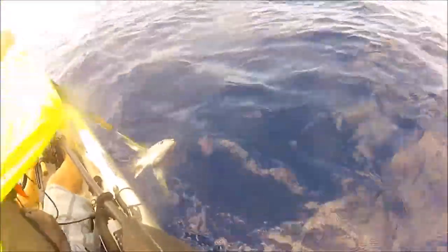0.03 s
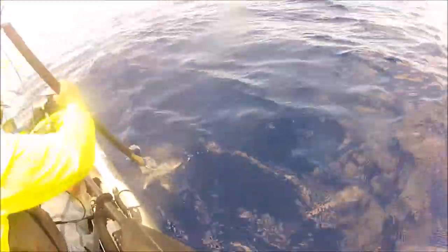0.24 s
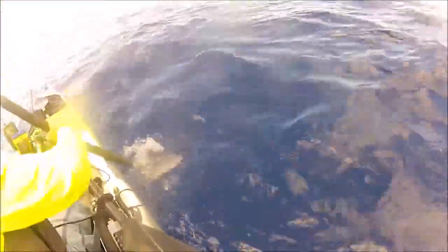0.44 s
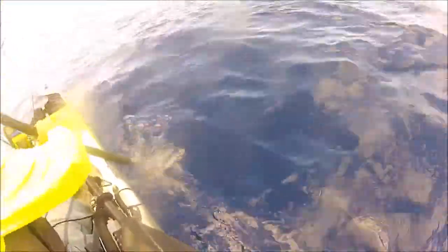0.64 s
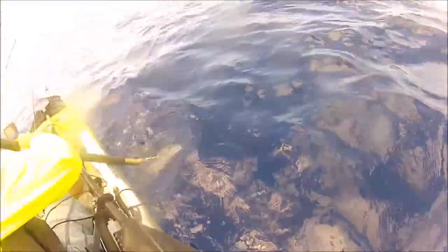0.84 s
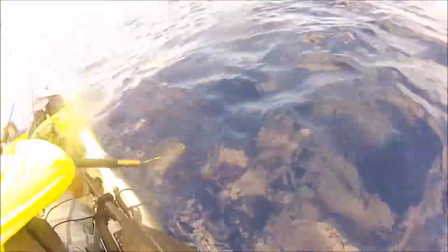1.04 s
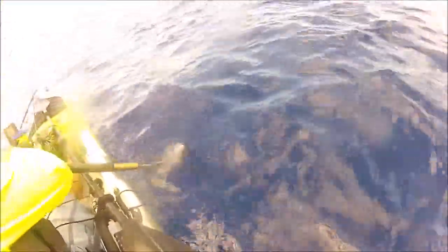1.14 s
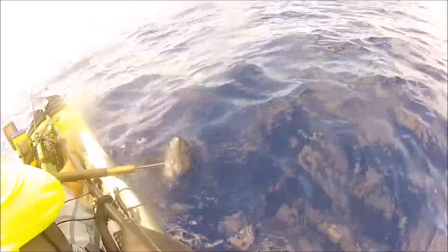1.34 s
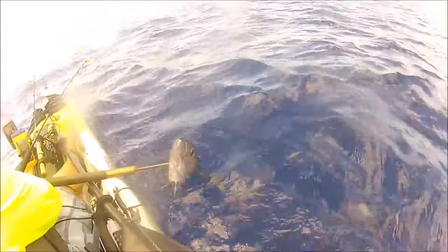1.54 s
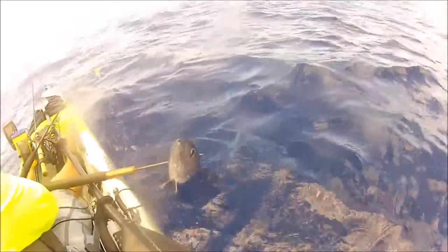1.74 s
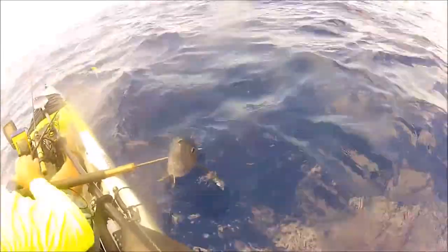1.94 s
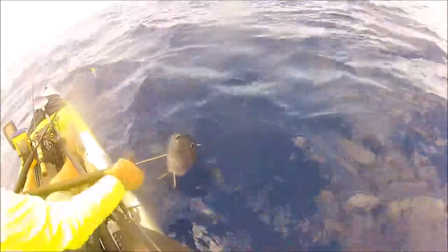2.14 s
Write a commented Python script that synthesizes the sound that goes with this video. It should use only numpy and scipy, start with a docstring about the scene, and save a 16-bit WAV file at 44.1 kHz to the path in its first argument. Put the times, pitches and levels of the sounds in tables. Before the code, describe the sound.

Hollow knocks on a plastic kayak hull dominate, heard through a waterproof camera housing over faint wind and sea. At about 0.1 seconds a fish splashes in with a gulp, and drops patter until 0.8. The hull booms hardest from 0.4 to 0.7 seconds, then bumps and rumbles more softly. Water glugs underneath around 1 second, and tackle clicks at 1.4 and 1.7.

```python
"""Over faint wind and open water, a fish on a pole slaps into the sea beside a plastic kayak.
Trapped air gulps, then spray patters back down in ticks and pings. From about 0.4 s the hollow
hull booms under hard knocks and rumbles as the angler shifts. Around 1 s water glugs beneath it,
and the tackle clicks at 1.4 and 1.7 s. All is heard through a camera's waterproof housing."""
import sys
import numpy as np
from scipy import signal
from scipy.io import wavfile
from scipy.ndimage import uniform_filter1d

SR = 44100
rng = np.random.default_rng(int(sys.argv[2]) if len(sys.argv) > 2 else 0)


def log_audio(samples):
    """Write samples as a 16-bit WAV file to the path given in sys.argv[1]."""
    # one column per channel
    frames = np.atleast_2d(samples).T
    # limit to full scale, then quantise
    limited = np.clip(frames, -1, 1)
    pcm = np.round(limited * 32767).astype(np.int16)
    wavfile.write(sys.argv[1], SR, pcm)


N = 97020
HULL_TOP_HZ = 1430


def amp(db):
    """Decibels to gain."""
    return 10 ** (np.asarray(db) / 20)


def unit(x):
    """Scales to rms 1."""
    return x / np.sqrt(np.mean(x ** 2) + 1e-20)


def level(points, column=1):
    """A fader ride: gain over time from a column of dB points."""
    rows = np.array(points)
    return amp(np.interp(np.arange(N) / SR, rows[:, 0], rows[:, column]))


def add(mix, s, sound):
    """Mixes a sound in at time s."""
    part = mix[max(round(s * SR), 0):][:len(sound)]
    part += sound[:len(part)]


def colour(x, points, size=16384):
    """Minimum-phase EQ of unit energy, drawn through (Hz, dB) points."""
    hz, db = np.transpose(points)
    bins_hz = abs(np.fft.fftfreq(size, 1 / SR))
    log_gain = np.log(amp(np.interp(np.log(bins_hz + 1), np.log(hz + 1), db)))
    taps = np.fft.ifft(np.exp(np.conj(signal.hilbert(log_gain)))).real[:size // 2]
    return signal.fftconvolve(x, taps / np.linalg.norm(taps))[:len(x)]


def lowpass(x, hz, order=6):
    """Causal Butterworth low-pass."""
    return signal.sosfilt(signal.butter(order, hz, fs=SR, output="sos"), x)


def fade(t, t60):
    """Falls 60 dB in t60 seconds."""
    return np.exp(-np.log(1000) * t / t60)


def wander(size):
    """Random drift of rms 1, smoothed over size samples."""
    return unit(uniform_filter1d(uniform_filter1d(rng.standard_normal(N), size), size))


def noise(eq, patchy_db):
    """Coloured noise of rms 1 whose level wanders."""
    steady = colour(rng.standard_normal(2 * N), eq)[N:]
    return unit(steady * amp(patchy_db * wander(size=2500)))


def patter(per_s, spread_db):
    """Random tiny impacts; a wider spread makes a few stand out."""
    sizes = amp(spread_db * np.minimum(rng.exponential(1, N), 4))
    return unit(sizes * rng.choice([-1, 1], N) * (rng.random(N) < per_s / SR))


def bubble(hz, t60, attack_s=0.00093, glide_per_s=0.55):
    """Trapped air rings briefly, rising in pitch and wobbling as the pocket deforms."""
    t = np.arange(SR // 5) / SR
    wobble = 0.035 * wander(size=100)[:len(t)]
    turns = np.cumsum(hz * (1 + glide_per_s * t + wobble)) / SR
    return np.sin(2 * np.pi * turns) * fade(t, t60) * (1 - np.exp(-t / attack_s))


def splash():
    """Sharp slaps with a wet ring, then thinning spray and single drops that tick and ping."""
    # fish and thrown water hitting the surface: (time [s], level [dB], t60 [s], ring pitch [Hz])
    slaps = [(0.1294, -32, 0.0087, 4470), (0.1322, -43, 0.044, 2310), (.138, -37, 0.065, 4400),
             (0.146, -28, 0.017, 3270), (.149, -28, 0.012, 4070), (0.153, -42, 0.018, 2420),
             (.169, -47.5, 0.058, 2820), (0.195, -47, 0.0088, 4120), (.253, -46, 0.068, 2630),
             (0.2582, -47, 0.0076, 5140), (0.366, -49.5, 0.043, 4220)]
    # fader ride of the falling spray: (time [s], level [dB])
    spray = [(0, -73), (.12, -66.5), (.135, -44.5), (.16, -44.5), (.185, -47.5), (.205, -57.5), (.24, -62),
             (.26, -59), (.3, -53.5), (.34, -59.5), (.42, -66), (.66, -63.5), (.75, -70.5), (.83, -73),
             (2.2, -78.5)]
    # drops falling back: (time [s], pitch [Hz], ping [dB], tick [dB])
    drops = [(0.2711, 2830, -53, -33), (.292, 3000, -52, -38), (0.303, 2870, -47, -37),
             (0.323, 3130, -56, -45), (.4535, 2874, -46, -39.5), (0.464, 2950, -56, -48),
             (0.511, 2900, -60, -49), (.537, 2880, -51.5, -43), (0.605, 2990, -50, -54),
             (0.663, 2870, -54, -53), (0.673, 3116, -58, -40.5), (0.724, 2420, -50.5, -49),
             (0.739, 2890, -59, -42), (0.78, 3254, -57, -45), (0.796, 1820, -57, -58)]
    # EQ the housing puts on the water noise: (frequency [Hz], level [dB])
    housing_eq = [(300, -26), (800, -9), (1500, -24), (2100, -7.5), (2600, -1.5), (2800, 5.5), (2920, 2),
                  (3080, -1), (3400, -19.5), (3850, -6.5), (4200, -10), (4500, -9), (5100, -7),
                  (6000, -22.5), (7100, -8.5), (8400, -19), (9100, -4.5), (10400, -26.5), (11500, -51.5),
                  (12600, -26.5), (13500, -28), (14900, -14), (15700, -2.5)]
    crackle_share, slap_attack_s, slap_ring_db, spatter_db = 0.35, 0.00023, -1, -14.5
    t = np.arange(SR // 5) / SR
    water = patter(per_s=4500, spread_db=4.5) * level(spray) * amp(1.5 * wander(size=500))
    pings = np.zeros(N)
    for s, db, t60, hz in slaps:
        hiss = rng.standard_normal(len(t))
        crackle = patter(per_s=1900, spread_db=7.5)[:len(t)]
        burst = unit((1 - crackle_share) * hiss + crackle_share * crackle)
        add(water, s, amp(db) * burst * fade(t, t60) * (1 - np.exp(-t / slap_attack_s)))
        add(pings, s, amp(db + slap_ring_db) * bubble(hz, t60=0.0092))
    for s, hz, ping_db, tick_db in drops:
        add(water, s, amp([tick_db]))  # a one-sample tick, with a tail of spatter
        add(water, s, amp(tick_db + spatter_db) * rng.standard_normal(len(t)) * fade(t, t60=0.022))
        add(pings, s, amp(ping_db) * bubble(hz, t60=0.023))
    return colour(water, housing_eq) + pings


def knocks():
    """Each blow thuds and rings the hull; where it lands sets the blend of boom, body and clack."""
    # blows on the hull: (time [s], boom [dB], body [dB], clack [dB], attack at 300 Hz [s],
    # ring length [factor on t60], how sharp the boom starts [fraction of its pitch])
    blows = [(0.251, -43.5, -48, -49.5, 0.0015, 0.88, 0), (0.4063, -13, -13.5, -30, 0.0015, 0.7, 0.041),
             (0.5109, -33, -16, -41.5, 0.0033, 0.76, 0.37), (0.5222, -20.5, -52.5, -53, 0.0034, 1.7, .25),
             (0.5268, -35, -59.5, -42.5, 0.0025, 1, 0.15), (0.5691, -16, -52, -58, 0.0047, 0.48, 0.007),
             (0.6396, -23, -20.5, -52.5, 0.001, 0.42, 0.17), (0.655, -36, -53, -59, 0.0031, 3.93, 0.2),
             (0.7199, -31.5, -72, -61, 0.0012, 0.58, 0.17), (0.751, -43, -47.5, -46.5, 0.0044, 1.1, 0.11),
             (0.849, -57, -35, -43.5, 0.0056, 0.76, 0.034), (0.955, -56, -54.5, -56, 0.0046, 2.6, 0),
             (1, -26.5, -45, -52, 0.0037, 0.53, 0.081), (1.096, -36, -65, -46.5, 0.006, 0.73, 0),
             (1.128, -32, -66, -62, 0.00088, 0.61, 0.055), (1.1707, -38.5, -65, -61, 0.00096, 2.4, 0.13),
             (1.308, -55, -49, -57, 0.0092, 4.1, 0.034), (1.4347, -24, -32, -54.5, 0.0015, 0.84, 0),
             (1.5183, -31, -58, -62, 0.0053, 0.77, 0.12), (1.546, -47, -42.5, -44.5, 0.0047, 1.47, 0),
             (1.564, -51, -38.5, -51, 0.0023, 1.1, 0.13), (1.677, -63, -32.5, -41, 0.0022, 1.06, 0.23),
             (1.685, -61, -33, -45.5, 0.0095, 1.45, 0)]
    # hull modes: (frequency [Hz], level [dB], t60 [s])
    modes = [(121.2, 1, 0.13), (184, -13.5, 0.058), (200.9, -13.5, 0.25), (246.4, 3.5, 0.061),
             (272.3, 2, 0.087), (315.6, -1.5, 0.051), (390, -13, 0.082), (521.2, 8.5, 0.048),
             (540, -1.5, 0.034), (627, -3.5, 0.079), (758, -6, 0.061), (930, -10.5, 0.036),
             (1215, -17, 0.044)]
    boom_top_hz, body_top_hz, detune, settle_s = 215, 450, 0.02, 0.022
    cavity_hz, cavity_db, thud_hz, thud_db = 121, -12, 740, 3.5
    rings, thuds, t = np.zeros(N), np.zeros(N), np.arange(SR // 2) / SR
    hz, db, t60 = np.transpose(modes)
    band = np.digitize(hz, [boom_top_hz, body_top_hz])  # 0 boom, 1 body, 2 clack
    polarity = (-1) ** np.arange(len(hz))
    for s, boom_db, body_db, clack_db, attack_s, length, sharp in blows:
        # the boom's phase runs fast at first, so its pitch sinks as the hull settles
        sinking = t + sharp * settle_s * (1 - np.exp(-t / settle_s))
        pitch = hz * (1 + detune * rng.standard_normal(len(hz)) * (band > 0))
        turns = pitch[:, None] * np.where(band[:, None] == 0, sinking, t)
        gains = polarity * amp(db + np.array([boom_db, body_db, clack_db])[band])
        swell = 1 - np.exp(-t / (attack_s * (300 / hz[:, None]) ** 0.86))  # low modes bloom later
        add(rings, s, gains @ (np.sin(2 * np.pi * turns) * swell * fade(t, length * t60[:, None])))
        hollow_hum = np.sin(2 * np.pi * cavity_hz * sinking) * fade(t, t60=0.5) * swell[0]
        add(rings, s, amp(boom_db + cavity_db) * hollow_hum)
        add(thuds, s, amp(clack_db + thud_db) * rng.standard_normal(len(t)) * fade(t, t60=0.016))
    return lowpass(rings + lowpass(thuds, thud_hz, order=2), HULL_TOP_HZ, order=3)


def bubbles():
    """Air pockets close around the splash and along the hull, from small plips to deep gulps."""
    # closing pockets: (time [s], pitch [Hz], level [dB], t60 [s])
    pockets = [(.114, 680, -43.5, 0.056), (.1495, 523, -30.5, 0.077), (.152, 643, -29.5, 0.052),
               (.176, 617, -36.5, 0.046), (0.194, 1100, -43.5, 0.055), (0.213, 773, -47.5, 0.2),
               (0.225, 90.6, -26.5, 0.076), (0.243, 53.4, -37, 0.65), (.252, 807, -39.5, 0.041),
               (1.316, 773, -44, 0.045), (1.349, 804, -49.5, 0.086), (1.362, 1207, -51.5, 0.052)]
    out = np.zeros(N)
    for s, hz, db, t60 in pockets:
        add(out, s, amp(db) * bubble(hz, t60))
    return out


def shifting():
    """Weight moving in the hull makes a low rumble and grainy scuffing."""
    # fader rides of the movement: (time [s], rumble [dB], scuff [dB])
    moves = [(0, -54.5, -56.5), (.11, -51.5, -60), (.19, -38, -50), (.26, -58, -47), (.35, -57, -60),
             (.55, -33, -58), (.75, -51.5, -51), (.9, -50, -58.5), (.98, -42.5, -55), (1.07, -45, -58),
             (1.2, -43, -60.5), (1.35, -51.5, -50.5), (1.45, -36, -55.5), (1.6, -49, -58.5),
             (1.76, -59.5, -59), (1.9, -55, -63), (2.2, -71, -61.5)]
    # tone of the rumble and of the scuffing: (frequency [Hz], level [dB])
    rumble_eq = [(25, -31), (50, -4), (72, -9), (92, -13.5), (130, -2.5), (170, -14.5), (215, -18),
                 (290, -18), (400, -35), (900, -73)]
    scuff_eq = [(120, -14.5), (225, 7.5), (300, 7), (420, -3), (520, -4.5), (800, -13), (1000, -18),
                (1250, -19.5), (1500, -23.5), (1800, -19.5), (2400, -32.5), (4000, -65.5)]
    scuff = unit(colour(patter(per_s=500, spread_db=0.5), scuff_eq))
    rumble = noise(rumble_eq, patchy_db=4)
    return rumble * level(moves, column=1) + scuff * level(moves, column=2)


def surges():
    """Water pushes on air caught under the hull: round, gliding glugs that swell and fade."""
    # glugs: (time [s], length [s], start pitch [Hz], end pitch [Hz], level [dB])
    glugs = [(0.961, 0.042, 323, 304, -42.5), (1.01, 0.24, 77.2, 69.8, -39),
             (1.14, 0.13, 193.8, 207.4, -44.5), (1.247, .085, 314.3, 256, -44),
             (1.262, 0.16, 69.4, 70, -40.5)]
    out = np.zeros(N)
    for s, length, start_hz, end_hz, db in glugs:
        progress = np.arange(0, length, 1 / SR) / length
        turns = np.cumsum(start_hz + (end_hz - start_hz) * progress) / SR
        add(out, s, amp(db) * np.sin(np.pi * progress) * np.sin(2 * np.pi * turns))
    return out


def tackle():
    """Hard little clicks with a short metallic ring."""
    # tackle hits: (time [s], crack [dB], ring [dB], tone pitch [Hz], tone [dB])
    clicks = [(1.4186, -37, -53.5, 4130, -41), (1.4209, -55.5, -53, 7780, -63),
              (1.7422, -50, -71, 2900, -51)]
    # tackle modes: (frequency [Hz], level [dB], t60 [s])
    modes = [(2050, -21, 0.016), (2700, 0, 0.011), (3600, 2, 0.014), (4790, -14, 0.021), (7780, 2, 0.031),
             (9650, -22, 0.036)]
    # tone of the crack: (frequency [Hz], level [dB])
    crack_eq = [(500, 2), (1600, -15.5), (2120, 7), (2350, -8), (2650, 7.5), (3000, -6), (3500, 3.5),
                (4220, -0.5), (4550, -2), (5000, -2), (6000, -37), (7000, -4), (7780, -6), (8400, -5),
                (9150, -4), (11000, -30), (13000, -25), (14800, -10), (15800, -16)]
    cracks, rings, t = np.zeros(N), np.zeros(N), np.arange(SR // 10) / SR
    ring = sum(amp(db) * np.sin(2 * np.pi * hz * t) * fade(t, t60) for hz, db, t60 in modes)
    for s, crack_db, ring_db, tone_hz, tone_db in clicks:
        add(cracks, s, amp(crack_db) * rng.standard_normal(len(t)) * fade(t, t60=0.02))
        tone = np.sin(2 * np.pi * tone_hz * t) * fade(t, t60=0.032)
        add(rings, s, amp(ring_db) * ring + amp(tone_db) * tone)
    return colour(cracks, crack_eq) + rings


def wind():
    """Gusts buffet the housing with a soft sub-bass rumble."""
    # fader ride of the gusts: (time [s], level [dB])
    gusts = [(0, -44), (.2, -46), (.24, -40), (.33, -40), (.55, -53), (.9, -55), (1.1, -42), (1.35, -43),
             (1.68, -47.5), (1.9, -53.5), (2.2, -52)]
    # tone of the buffeting: (frequency [Hz], level [dB])
    wind_eq = [(8, -29), (21, -9.5), (28, 12), (35, -4), (46, -10), (65, -21.5), (110, -36), (300, -71.5)]
    return noise(wind_eq, patchy_db=1) * level(gusts)


def sea():
    """The hush of open water, with the faint drone of the hull on it."""
    # tone of the water bed: (frequency [Hz], level [dB])
    sea_eq = [(80, -7), (125, -10.5), (160, -15.5), (195, -8.5), (228, 3.5), (265, -17.5), (330, -23.5),
              (550, -24), (780, -25), (1630, -33.5), (2180, -29), (2550, -31.5), (4750, -38), (5990, -50),
              (7400, -41), (15500, -50)]
    return amp(-57) * noise(sea_eq, patchy_db=0.8)


def scene():
    """Hull, water, tackle and wind at one microphone."""
    return (knocks() + shifting() + splash() + bubbles() + surges() + tackle() + wind() + sea())[None]


def record(dry):
    """The recorder mirrors the lows around 12 kHz, a thin whistle on each knock, then cuts the top."""
    sample_hold_hz, whistle_db, edge_hz = 12000, 0.5, 15500
    slope = np.gradient(lowpass(dry[0], HULL_TOP_HZ)) * SR / (2 * np.pi * sample_hold_hz)
    carrier = np.sin(2 * np.pi * sample_hold_hz * np.arange(N) / SR)
    whistle = 2 * amp(whistle_db) * slope * carrier
    high_cut = signal.firwin(255, edge_hz, window=("kaiser", 9), fs=SR)
    return signal.oaconvolve(dry + whistle, high_cut[None], "same")


dry = scene()
out = record(dry)
log_audio(out)
```